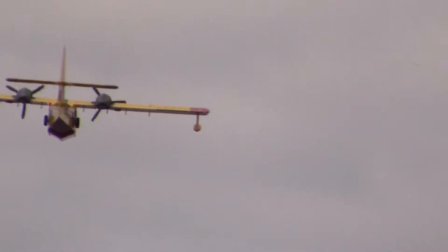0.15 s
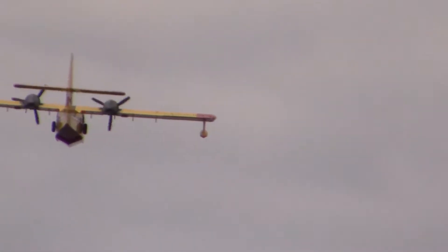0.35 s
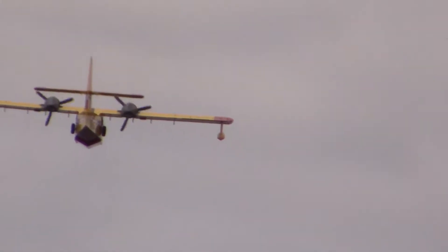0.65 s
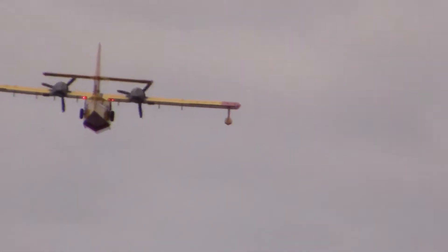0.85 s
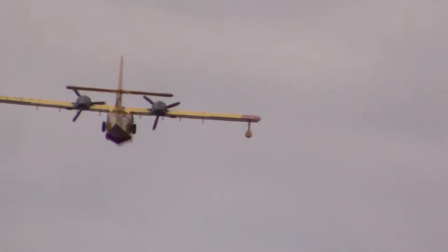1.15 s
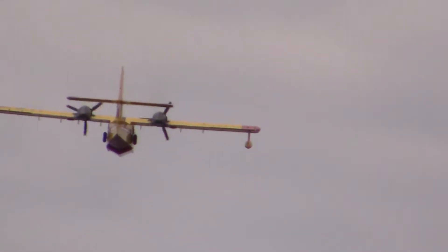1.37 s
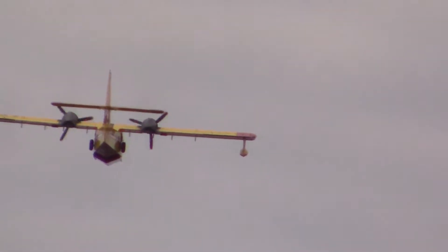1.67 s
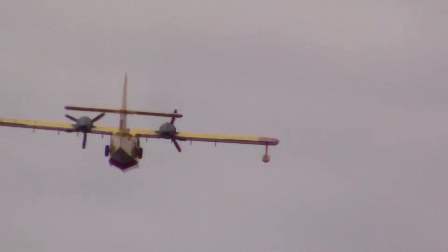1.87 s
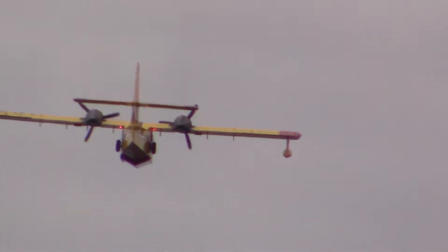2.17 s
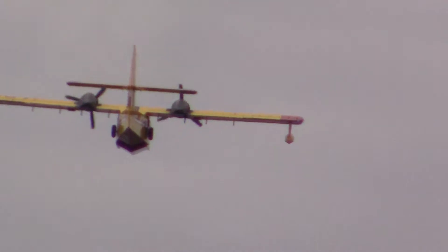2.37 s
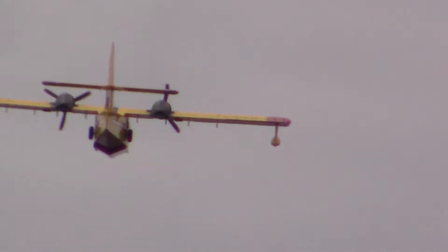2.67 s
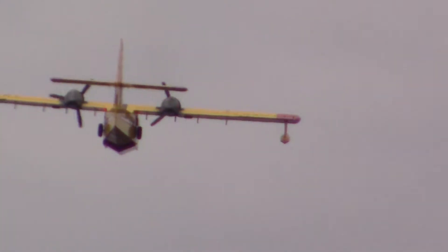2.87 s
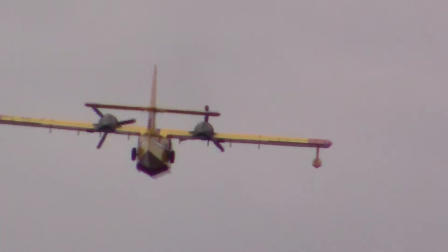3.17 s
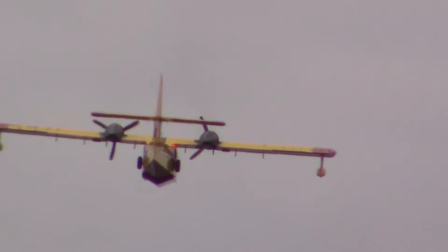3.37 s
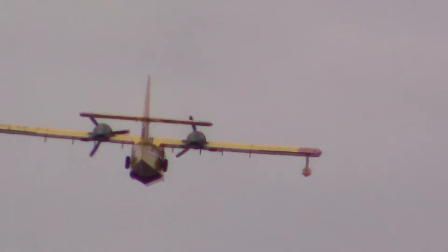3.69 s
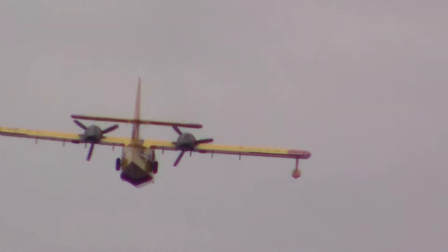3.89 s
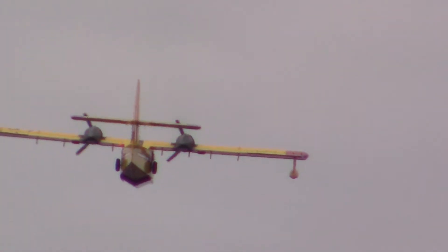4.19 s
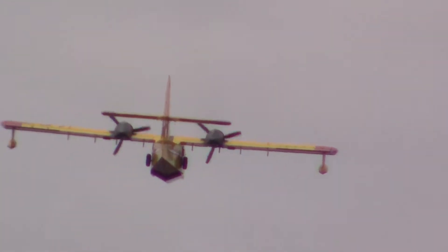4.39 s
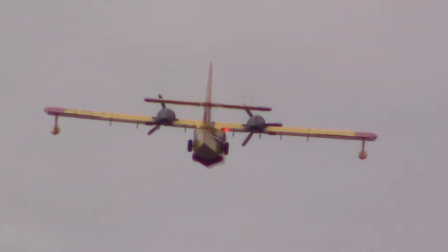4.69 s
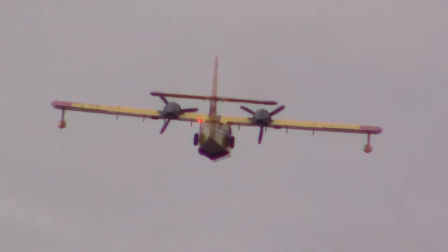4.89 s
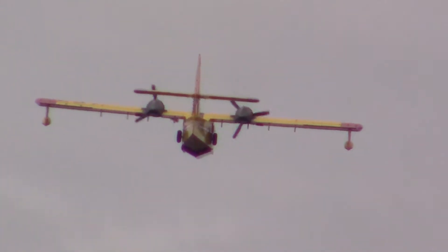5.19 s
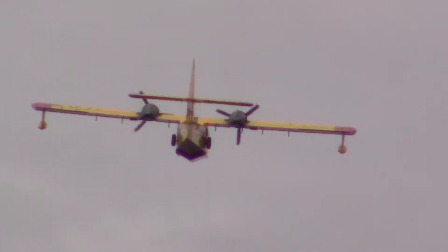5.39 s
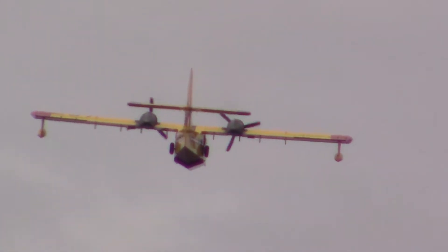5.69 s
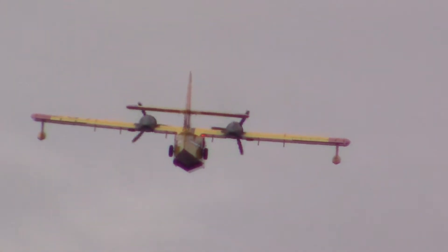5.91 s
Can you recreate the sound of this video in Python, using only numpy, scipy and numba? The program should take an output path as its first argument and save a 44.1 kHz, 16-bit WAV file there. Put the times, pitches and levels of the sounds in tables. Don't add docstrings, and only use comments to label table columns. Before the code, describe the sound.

A twin-engine propeller plane drones steadily in the distance, sinking, swelling and fading, while low wind gusts buffet the microphone and small camera clicks tick.

```python
import sys
import numpy as np
from scipy import signal
from scipy.fft import rfft, irfft, next_fast_len
from scipy.io import wavfile
from scipy.ndimage import uniform_filter1d
from numba import njit

SR = 44100
rng = np.random.default_rng(int(sys.argv[2]) if len(sys.argv) > 2 else 0)


def wav_record(signal):
    frames = np.transpose(np.atleast_2d(signal))
    bounded = np.clip(frames, -1, 1)
    quanta = np.round(bounded * 32767).astype(np.int16)
    wavfile.write(sys.argv[1], SR, quanta)


def invert_db(level):
    return 10 ** (np.asarray(level, dtype=float) / 20)


N = 266800
T = np.arange(N) / SR

ENGINE_CYCLE_HZ = [16.632, 16.712]
# multiple of the engine cycle, level_db
ENGINE_TONES = [(18, -47.5), (19, -57), (21, -54.5), (22, -43.5), (23, -45), (25, -42), (26, -53),
                (27, -52), (28, -43), (29, -46.5), (30, -44), (31, -42), (32, -45.5), (33, -53.5),
                (34, -46.5), (36, -56.5), (37, -48), (38, -49.5), (42, -57.5), (46, -60.5), (50, -67)]
# pitch_hz, level_db (per Hz)
COWLING_COLOUR = [(60, -32), (120, -2.5), (300, -2), (450, -2.5), (550, -0.5), (680, -4.5), (850, -20.5),
                  (1100, -45)]
# pitch_hz, level_db (per Hz)
EXHAUST_COLOUR = [(400, -23.5), (600, -8.5), (750, 2), (900, -4), (1050, -9.5), (1300, -13), (2000, -55)]
# pitch_hz, level_db (per Hz)
TIPS_COLOUR = [(700, -23.5), (1000, -3.5), (1350, -0.5), (1700, -3), (2100, -13.5), (2600, -21),
               (3200, -29.5), (4500, -56.5)]
# time_s, carry_db (of the air), turn_db (exhaust toward us, against blade tips)
FLIGHT_PATH = [
    (0, 1, 0.5),
    (.7, 1.5, -3.5),
    (1.3, 1, -2),
    (2.1, -1.5, -3),
    (2.7, 0, 0.5),
    (3.65, 0.5, 6.5),
    (4.3, -1, 0.5),
    (5.2, 1, -3),
    (6.05, -3.5, 5),
]
# time_s, level_db, lean_db (toward the left port), eddy_hz
GUSTS = [(0, -15.5, -5, 189), (.42, -12.5, 0, 187.4), (1.35, -16, 1.5, 189), (1.92, -18.5, 1.5, 159.4),
         (2.1, -34, 0, 151), (2.3, -21, 2, 141), (2.47, -18.5, 1.5, 143.7), (2.63, -32, 2, 150),
         (3.2, -30.5, 1.5, 130.3), (3.52, -19, 9, 173), (3.8, -17.5, 1.5, 197), (4.3, -18, 4.5, 151),
         (4.42, -25.5, 2.5, 175), (4.74, -31, 0.5, 162), (4.84, -17, 2, 194), (5.33, -16.5, 4.5, 169.3),
         (5.78, -24.5, 1.5, 172.5), (5.93, -16, 5, 161)]
# pitch_hz, level_db (per Hz)
THUMP_COLOUR = [(30, -47), (60, -33.5), (100, -8), (150, 0), (220, -1.5), (300, -6), (400, -16.5),
                (600, -44), (1000, -56.5)]
# pitch_hz, level_db (per Hz)
PUFF_COLOUR = [(100, -32), (200, -6.5), (300, 0.5), (400, -4), (550, -10.5), (750, -22.5), (1000, -31),
               (1500, -42.5), (2500, -61)]
# pitch_hz, level_db (per Hz)
RUMBLE_COLOUR = [(20, -29), (40, -23), (60, -13), (85, -2.5), (120, 4), (170, -5.5), (250, -15.5)]
# pitch_hz, level_db (per Hz)
HISS_COLOUR = [(600, -7.5), (1500, -12.5), (2500, -3.5), (3900, -2.5), (5500, -4.5), (8000, -8.5),
               (12000, -14), (17000, -23)]
# start_s, length_s, level_db
MOTOR_RUNS = [(.115, .055, -66), (.21, .04, -67), (.385, 0.03, -59), (.47, 0.033, -63), (.62, 0.032, -61),
              (.7, .035, -74), (.87, .05, -72), (1.285, 0.24, -67), (1.565, 0.82, -73), (2.365, .4, -73),
              (2.765, 0.21, -67), (3.21, .05, -71), (3.3, .04, -71), (3.41, .045, -64), (3.77, .03, -68),
              (3.86, .09, -69), (4.02, 0.054, -67), (4.15, .07, -72), (4.52, .05, -70), (4.69, .17, -72),
              (4.97, .05, -65), (5.13, .05, -76), (5.24, .06, -73), (5.39, .045, -74), (5.55, .05, -69),
              (5.79, .07, -68)]
# time_s, peak_db, bright_db (per octave), lowest_mode_db
TICKS = [(0.22, -40, 3.5, -17), (0.2273, -29.5, -2, -4), (.2290, -21, -1.5, -4.5), (0.2316, -33, -1, -3),
         (.3286, -38, 0.5, -4), (0.332, -50, 4.5, -7), (1.4288, -40, -5.5, -7), (1.498, -41, -3, -6),
         (2.7199, -27, -3.5, -7), (2.7202, -38, 5, -9), (2.777, -51, 0, -6)]
# pitch_hz, level_db, decay_s (to -60 dB), left_lead_rad
SHELL_MODES = [(1390, 2, 0.017, 0.091), (2150, 4.5, 0.0068, .4), (2500, -5.5, 0.019, 2.2),
               (3360, -15.5, .006, .8), (4030, -11.5, 0.0095, .5), (5100, -18, 0.0075, .4),
               (6340, -15, .007, .3), (7400, -21, 0.0086, .3), (9800, -25.5, 0.0045, .3),
               (12300, -23.5, 0.0036, .3)]


def level(x, db):
    return x * invert_db(db) / np.sqrt(np.mean(x ** 2))


def curves(table):
    time_s, *columns = np.transpose(table)
    return [np.interp(T, time_s, column) for column in columns]


def walk(rate_hz, t=T):
    held = np.repeat(rng.standard_normal(int(N / SR * rate_hz) + 2), 16)
    slewed = uniform_filter1d(uniform_filter1d(held, size=16), size=16)
    return 1.3 * np.interp(t * rate_hz * 16, np.arange(len(held)), slewed)


def noise():
    return rng.standard_normal(N)


def colour(x, points):
    pitch_hz, db = np.transpose(points)
    size = next_fast_len(N)
    log_hz = np.log(np.arange(size // 2 + 1) * SR / size + 1)
    gain = invert_db(np.interp(log_hz, np.log(pitch_hz), db, -120, -120))
    return irfft(rfft(x, size) * gain, size)[:N]


@njit
def svf(x, hz, sharp):
    y, band, low, damping = np.empty(len(x)), 0., 0., 1 / sharp
    for i in range(len(x)):
        g = np.tan(np.pi * hz[i] / SR)
        v = (band + g * (x[i] - low)) / (1 + g * (g + damping))
        band = 2 * v - band
        low = low + 2 * g * v
        y[i] = damping * v
    return y


def resonate(x, hz, sharp):
    return svf(x, hz + 0 * T, sharp)


def drone():
    out, t = 0, T[::16]
    for cycle_hz in ENGINE_CYCLE_HZ:
        turns = cycle_hz * t + .006 * walk(1., t)
        for multiple, db in ENGINE_TONES:
            waver = 1.1 * walk(5, t) + 2 * np.pi * rng.random()
            gain = invert_db(db - 3.5 + 2.7 * walk(2.53, t))
            out = out + gain * np.sin(2 * np.pi * multiple * turns + waver)
    return signal.resample_poly(out, 16, 1)[:N]


def shimmer(x, slow_db, quick_db):
    out = 0
    for hz in 60 * 2 ** np.arange(0, 6.4, .5):
        swell_db = slow_db * walk(1.5) + quick_db * walk(9)
        out = out + invert_db(swell_db) * resonate(x, hz, 3.)
    return out


def aircraft():
    carry_db, turn_db = curves(FLIGHT_PATH)
    drone_db = -35 + 5.5 * np.exp(-T / 0.92) + 0.13 * carry_db
    exhaust_db = -42 + carry_db + .6 * turn_db
    tips_db = -44.5 + 1.05 * carry_db - .7 * turn_db

    chop = 1 + 0.1 * sum(np.cos(2 * np.pi * 3 * hz * T) for hz in ENGINE_CYCLE_HZ)
    cowling = level(colour(chop * noise(), COWLING_COLOUR), 0)
    exhaust = level(colour(chop * noise(), EXHAUST_COLOUR), 0)
    tips = level(colour(chop * noise(), TIPS_COLOUR), 0)
    airframe = resonate(tips, 2500, 1.4)
    tips = invert_db(tips_db + 1.3) * (tips - airframe) + invert_db(-44.0) * airframe

    roar = invert_db(drone_db - 1.5) * cowling + invert_db(exhaust_db + 0.74) * exhaust + tips
    return invert_db(drone_db + 35.5) * drone() + invert_db(-3.5) * shimmer(roar, 1.9, 1.0)


def port_wind(gust_db, eddy_hz, puff_db):
    push = invert_db(2.14 * walk(25) + 2.77 * walk(150)) * noise()
    thump = colour(push, THUMP_COLOUR)
    eddy_push = colour(invert_db(2.0 * walk(20)) * noise(), THUMP_COLOUR)
    eddies = svf(eddy_push, 0.995 * eddy_hz * 2 ** (0.094 * walk(8)), 4.4)
    puffs = colour(invert_db(2.0 * walk(40)) * push, PUFF_COLOUR)
    return invert_db(gust_db) * (level(eddies, -3.0) + level(thump, -4.5) + invert_db(puff_db) * level(puffs, -2.7))


def wind():
    gust_db, lean_db, eddy_hz = curves(GUSTS)
    quick_db = 10 * np.log2(eddy_hz / 175)
    ports = []
    for side, puff_db in ((1, -11.5), (-1, -13.5)):
        toward_db = side * lean_db
        port_gust_db = gust_db + toward_db / 2 + 1.3 * walk(7)
        port_eddy_hz = eddy_hz * 1.027 ** side * (1 + .012 * toward_db)
        ports.append(port_wind(port_gust_db, port_eddy_hz, puff_db + quick_db + .25 * toward_db))
    return np.array(ports)


def rumble():
    gust_db = curves(GUSTS)[0]
    both, left, right = (level(colour(noise(), RUMBLE_COLOUR), 0) for _ in range(3))
    slow_db = -33.5 + 0.075 * (gust_db + 20.5) + 2.0 * walk(6.6)
    return invert_db(slow_db) * (both + 0.61 * np.array([left, right]))


def hiss():
    shared = level(colour(noise(), HISS_COLOUR), -60.9)
    apart = level(colour(noise(), HISS_COLOUR), -71)
    return shared + apart * np.array([[1], [-1]])


def lens_motor():
    idle_db, ramp_s, stutter_db, whine_hz = -76, .008, 2, 5561.5
    gain = invert_db(idle_db)
    for start_s, length_s, db in MOTOR_RUNS:
        since_start, until_end = T - start_s, start_s + length_s - T
        gate = np.clip(np.minimum(since_start, until_end) / ramp_s + .5, 0, 1)
        gain = gain + invert_db(db) * gate
    gain = gain * invert_db(stutter_db * walk(50) - 2.5)
    turn = 2 * np.pi * whine_hz * T + 1.3 * walk(20)
    return gain * (np.sin(turn) + invert_db(-21) * np.sin(2 * turn))


def housing_ticks():
    out = np.zeros((2, N))
    t = T[:2048]
    attack = 1 - np.exp(-t / 0.0001)
    for time_s, peak_db, bright_db, lowest_db in TICKS:
        i = int(time_s * SR)
        for hz, mode_db, decay_s, lead in SHELL_MODES:
            phase = 2 * np.pi * rng.random() + lead * np.array([[.5], [-.5]])
            tick_db = peak_db + mode_db + bright_db * np.log2(hz / 2000) + lowest_db * (hz < 1700)
            gain = invert_db(tick_db - 60 * t / decay_s)
            out[:, i:i + len(t)] += gain * attack * np.sin(2 * np.pi * hz * t + phase)
    return out


def scene():
    plane = aircraft()
    apart = invert_db(-4.5) * resonate(resonate(plane, 2550, 4.), 2550, 4.)
    plane = plane + apart * np.array([[-1], [1]])
    return plane + wind() + rumble() + hiss() + lens_motor() + housing_ticks()


def top_cut(x):
    return signal.sosfilt(signal.butter(12, 15720, fs=SR, output="sos"), x)


def record(dry):
    rounded = np.tanh(.85 * dry) / .85
    return top_cut(rounded)


dry = scene()
out = record(dry)
wav_record(out)
```